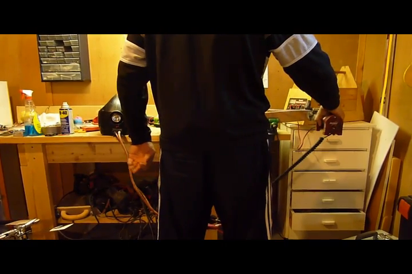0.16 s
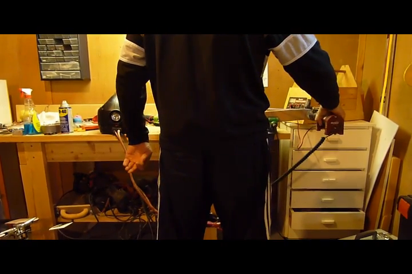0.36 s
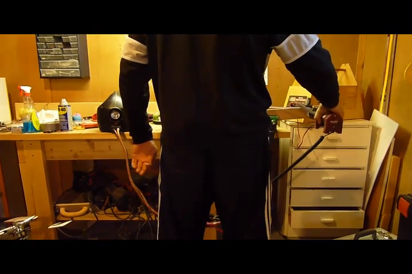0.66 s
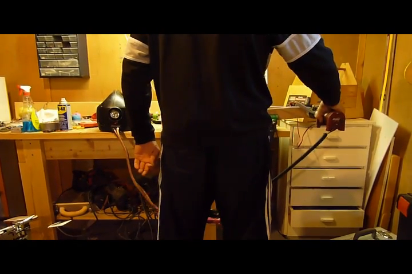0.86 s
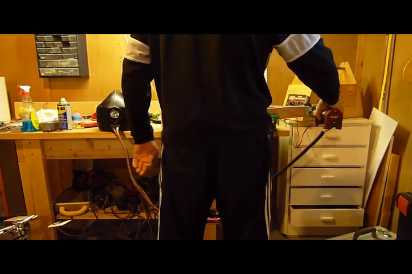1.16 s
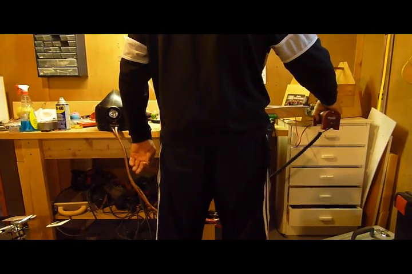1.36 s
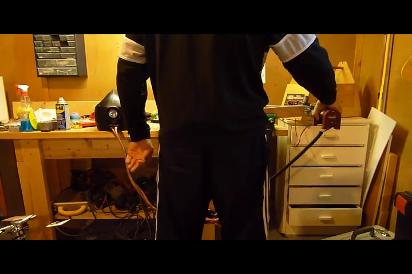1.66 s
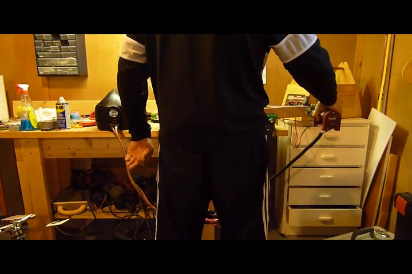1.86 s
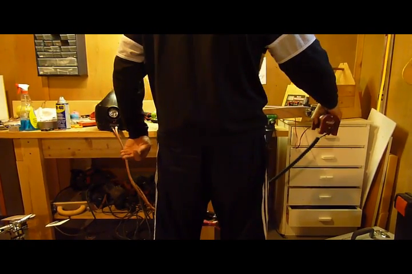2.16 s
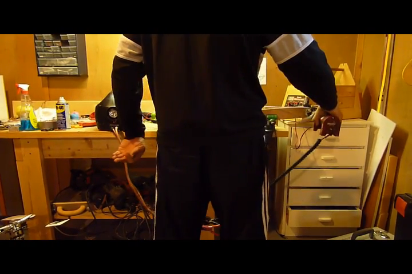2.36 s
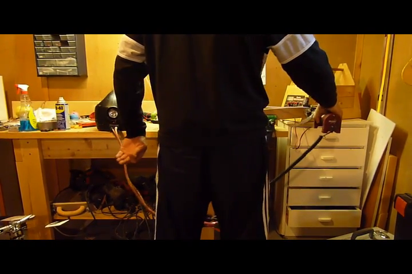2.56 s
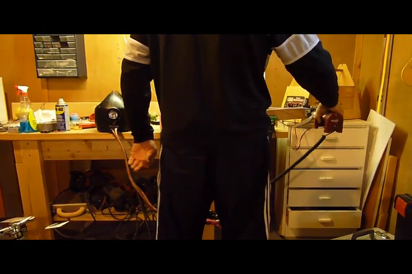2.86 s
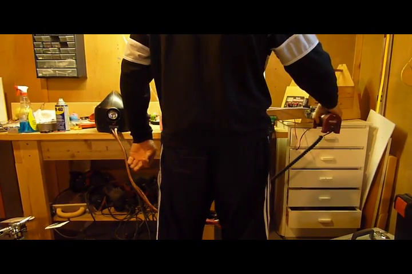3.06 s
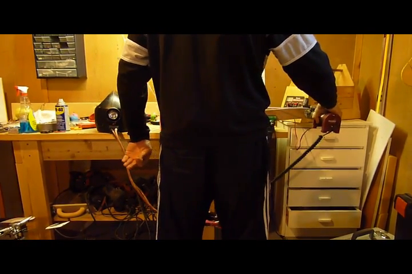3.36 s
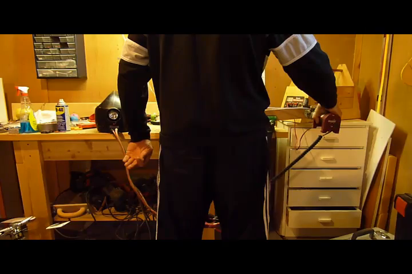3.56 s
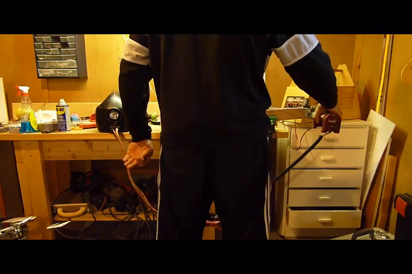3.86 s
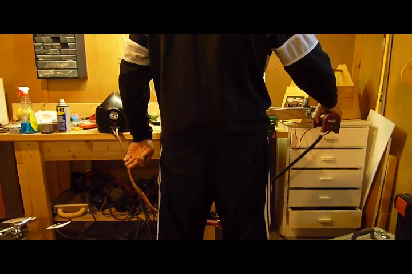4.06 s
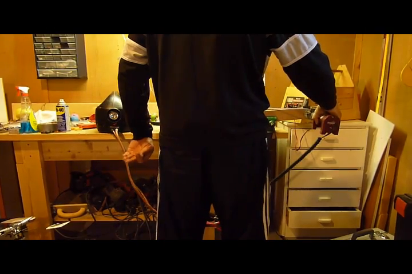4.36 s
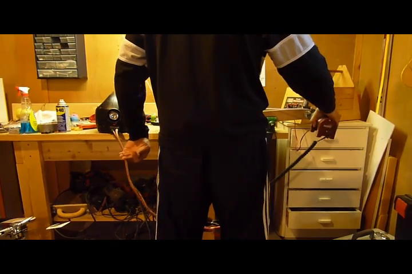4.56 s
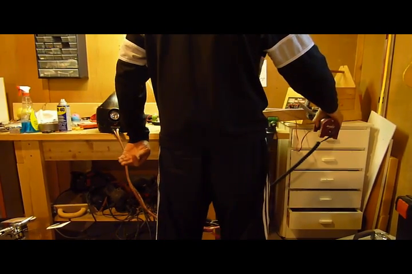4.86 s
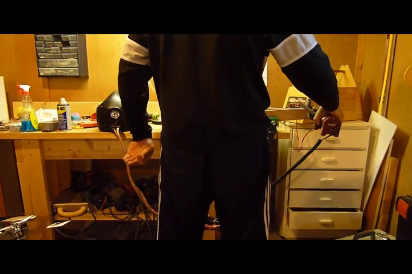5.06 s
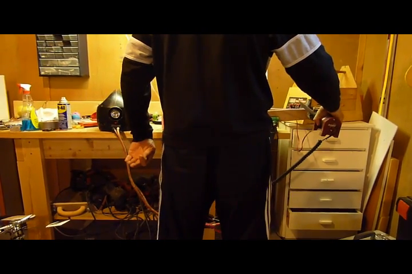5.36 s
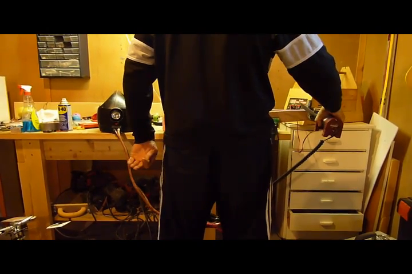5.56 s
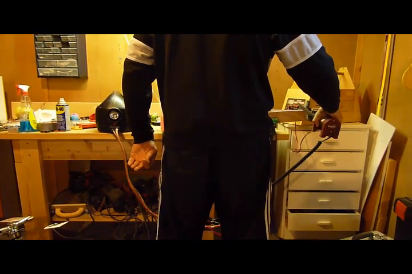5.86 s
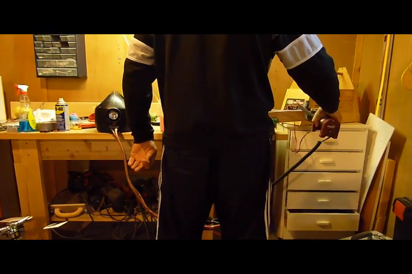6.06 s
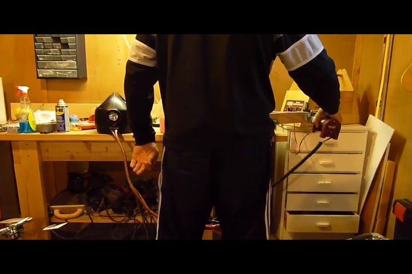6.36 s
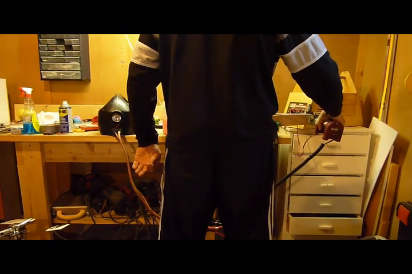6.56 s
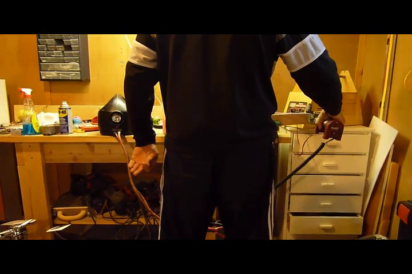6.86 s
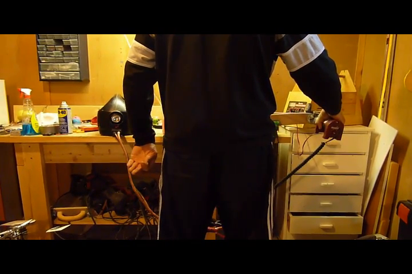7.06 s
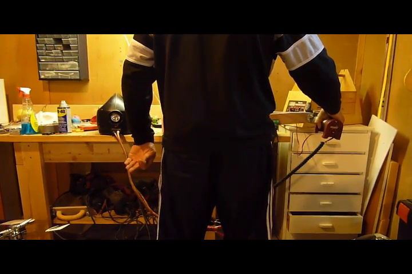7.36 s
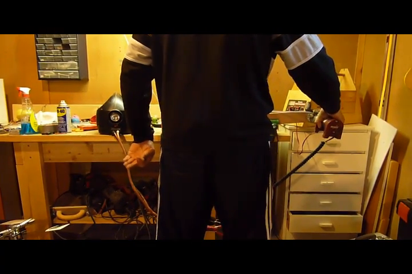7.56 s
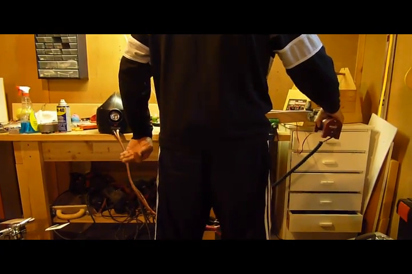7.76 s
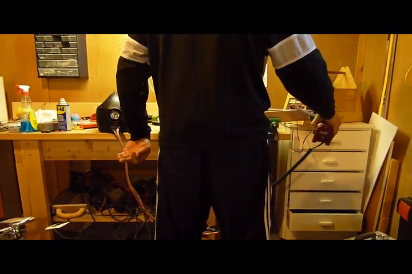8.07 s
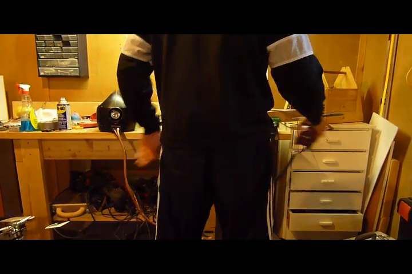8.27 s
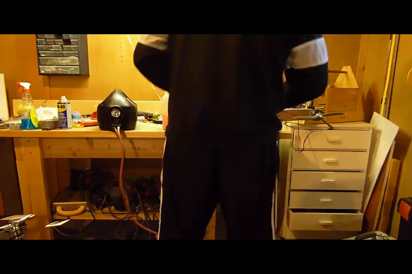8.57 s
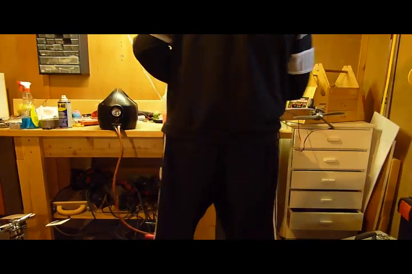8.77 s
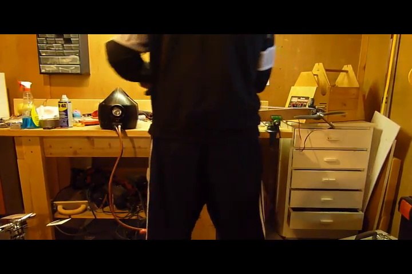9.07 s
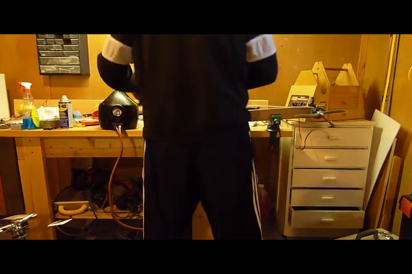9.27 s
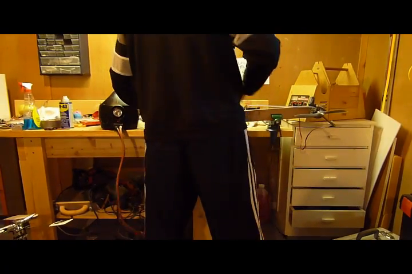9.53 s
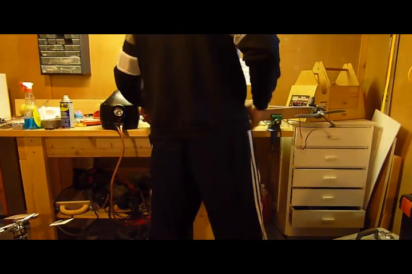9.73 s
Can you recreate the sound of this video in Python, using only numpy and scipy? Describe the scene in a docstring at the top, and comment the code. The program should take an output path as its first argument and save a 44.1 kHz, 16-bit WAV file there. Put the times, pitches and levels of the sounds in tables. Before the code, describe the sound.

In a small wooden workshop, an electric starter whirs and rattles a model engine, already running at the start. It stops, scrapes and clanks, then runs three more bursts, the last two longer. The engine never fires. Afterwards sleeves rustle softly, metal ticks, and an object is set down on wood. One fairly close, slightly dull microphone catches the room's short reverberation.

```python
"""Starter spinning a model engine

A hand-held electric starter spins a small model engine in four bursts in a wooden workshop, the first already
under way. The shaft hums on its turning orders and shakes loose parts, whose random collisions ring bench, casing
and gears; a slowing rotor scrapes. Metal clanks (noise crack, ringing modes), cloth rustles (grainy hiss) and
something is set down on wood (resonant blows). Room tone lies underneath; one band-limited microphone."""
import sys
import numpy as np
from scipy import signal
from scipy.fft import rfft, irfft, next_fast_len
from scipy.io import wavfile
from scipy.ndimage import uniform_filter1d, map_coordinates

SR = 44100
rng = np.random.default_rng(int(sys.argv[2]) if len(sys.argv) > 2 else 0)


def generate_wav(signal):
    """Clip the signal to [-1, 1] and save it as 16-bit WAV at the path in sys.argv[1]."""
    frames = np.transpose(np.atleast_2d(signal))
    scaled = np.clip(frames, -1, 1) * 32767
    pcm = np.round(scaled).astype(np.int16)
    wavfile.write(sys.argv[1], SR, pcm)


N = 436590
T = np.arange(N) / SR

# Starter bursts. Each row: full rattle reached in s, switch released in s, rattle collapses in s, bench joins in s,
# top speed in Hz, spin-up time constant in s, braking in Hz/s, extra casing-mode level in dB, collapse in dB/s,
# gears outlast the casing in s, bench outlasts the casing in s, rattle level in dB.
BURST_TABLE = [(-1, .11, .43, -1, 61, .14, 38, 6, 105, -.02, 0, -22.3),
               (1.3, 2.23, 2.45, 1.86, 62, .215, 100, 0, 160, -.08, -.02, -21),
               (3.255, 4.62, 4.89, 3.42, 62.6, .145, 80, 1, 140, .03, -.09, -21),
               (6.555, 8.06, 8.28, 6.72, 63, .13, 92, -2, 120, .03, -.12, -21.5)]
BURST_COLUMNS = ["bite_s", "release_s", "collapse_s", "join_s", "top_hz", "lag_s", "brake_hz_per_s",
                 "casing_mode_db", "fall_db_per_s", "gears_late_s", "bench_late_s", "rattle_db"]
BURSTS = [dict(zip(BURST_COLUMNS, row)) for row in BURST_TABLE]
# Rotor coasting to rest. Each row: start in s, end in s, scrape level in dB, rattle over the scrape in dB.
COAST_SPANS = [(.64, .93, -49, 3.5), (2.56, 2.62, -46, 1), (5.18, 5.36, -48, -5)]
# Shaft tones against speed. Each row: speed in Hz, first order in dB, second order in dB, higher orders in dB.
SHAFT_ANSWER = [(35, -80, -80, -50), (43, -64, -60, -40), (49, -55, -66, -37), (52.5, -46, -62, -36),
                (55.5, -60, -60, -33), (58.5, -60, -57, -31), (60.3, -58, -55, -36), (61.3, -52, -53, -45),
                (62, -48, -49, -38), (62.5, -55, -43, -33.5), (63, -51, -41.5, -35)]
# Bench answer to the higher orders. Each row: frequency in Hz, gain in dB.
BENCH_ANSWER = [(140, -12), (190, -10.5), (250, -9.5), (285, -19.5), (315, 1), (345, 2), (375, 0.5),
                (410, -5), (460, -6), (520, -16.5), (640, -8)]
# Rig resonances. Each row: frequency in Hz, width in Hz, lift over the broad colour in dB.
RIG_MODES = [(200, 30, 4), (340, 90, 5), (425, 40, 4), (600, 70, 4), (765, 25, 5), (845, 50, 7),
             (935, 45, 4), (1100, 25, 5), (1335, 50, 3), (1545, 30, 3), (1660, 30, 4), (1735, 70, 5),
             (1795, 50, 4), (1935, 30, 4), (2030, 30, 4), (2680, 40, 5), (2900, 40, 6), (3075, 70, 6),
             (3550, 140, 4), (3890, 70, 5), (4150, 45, 4), (4600, 60, 5), (4940, 70, 2), (5240, 50, 5),
             (5500, 60, 3), (5990, 50, 5)]
# Broad colour of the rig. Each row: frequency in Hz, relative spectrum in dB.
RIG_COLOUR = [(40, -49), (90, -36.5), (140, -18), (270, -8.5), (500, -5.5), (715, -8.5), (1200, -8.5),
              (2300, -9.5), (3300, -9.5), (4800, -14), (5700, -16), (6400, -23), (7000, -32.5),
              (7500, -43.5)]
# Bench, casing and gear-case modes. Each row: frequency in Hz, width before squaring in Hz, relative gain in dB.
LOUD_MODES = [(345, 80, 0), (1765, 120, 0), (3920, 80, 0)]
# Level of each loud mode. Each row: level over the rattle in dB, extra at the bite in dB,
# fade in spin-up time constants, extra once released in dB, random wander in dB.
MODE_LEVELS = [(-17, 14, .8, 0, 2.5), (-11, 7, 2, -3, 2.5), (-19, 4, 3, 4, 2.5)]
# Metal contacts. Each row: start in s, level before a common trim in dB, strongest answer in Hz, ring gain in dB,
# rise time constant in s, crack fall-off one octave away in dB (sign ignored).
CLANKS = [(.51, -33.5, 2500, -14, .004, 1), (.603, -30, 1800, -1, .004, 3), (.745, -41, 3000, -16, .004, 4),
          (1.221, -32, 1900, -4, .002, 4.5), (2.59, -36, 1800, -3, .005, 1),
          (2.821, -31, 1800, 3, .006, 3.5), (2.853, -25, 3940, -3, .008, -2.5),
          (2.8922, -10.5, 2570, -12, 0.0038, 1), (3.18, -30, 2980, -13, .004, 0),
          (3.191, -20, 3050, -17, 0.0046, 1.5), (6.458, -38.5, 1900, 0, .002, 5),
          (8.9715, -42, 4500, -15, 0.00087, 5), (9.079, -42, 2250, -1, .002, 4),
          (9.392, -44.5, 2900, -8, .002, 2), (9.6955, -20.5, 1250, -4, 0.0032, 1.5)]
# Ringing metal modes. Each row: frequency in Hz, relative level in dB, t60 in s.
METAL_MODES = [(1200, -4, .06), (1800, 0, .07), (2250, -3, .06), (2480, -2, .05), (2900, 0, .05),
               (3940, 0, .08), (4620, -6, .04), (5400, -5, .06)]
# Crack of a metal contact. Each row: frequency in Hz, relative spectrum in dB.
CRACK_COLOUR = [(50, -24.5), (120, -7), (330, 3), (800, -5), (1600, -6), (2600, -3.5), (4200, -6.5),
                (5600, -14.5), (6500, -20.5), (7500, -39)]
# Modes the scraping rotor sounds. Each row: frequency in Hz, width in Hz, relative gain in dB.
DRAG_MODES = [(860, 90, 0), (1880, 300, -13), (3300, 800, -24)]
# Cloth level. Each row: time in s, level in dB.
RUSTLE_LEVEL = [(8.55, -70), (8.65, -59), (8.88, -59), (9.09, -52), (9.17, -58), (9.43, -58), (9.62, -61),
                (9.69, -54), (9.72, -80)]
# Cloth colour. Each row: frequency in Hz, relative spectrum in dB.
CLOTH_COLOUR = [(290, -28), (500, 2), (775, -10), (906, -2), (1030, -7.5), (2220, -5.5), (5840, -15.5),
                (7310, -32.5), (9500, -68), (16100, -120)]
# Blows on wood. Each row: start in s, level before a common gain in dB.
THUMPS = [(9.7683, -19), (9.773, -9.5), (9.782, -22), (9.799, -12), (9.814, -23), (9.845, -34),
          (9.855, -26)]
# Wood resonances. Each row: frequency in Hz, width in Hz, relative gain in dB.
WOOD_MODES = [(150, 47, 0), (270, 70, 2.5), (376, 130, 0.5), (563, 110, -5.5), (700, 150, -4),
              (980, 200, -7), (1250, 200, -8), (1800, 300, -10), (2400, 400, -13)]
# Room tone. Each row: frequency in Hz, relative spectrum in dB.
AIR_COLOUR = [(15, -52.5), (25, -16.5), (43, -9.5), (129, -3.5), (188, -5), (296, -5.5), (393, -8),
              (562, -10.5), (603, -8), (712, -10), (802, -10), (4880, -24.5), (7310, -41), (9500, -75.5),
              (16100, -120)]
# Decay of the room. Each row: frequency in Hz, t60 in s.
WALL_DECAY = [(150, 0.57), (1000, 0.67), (4000, 0.39), (7500, 0.46)]

BITE_HZ = 37  # shaft speed when the rattle is full
RISE_DB_PER_S, SAG_DB_PER_S, TIRING_DB_PER_S = 400, 14, 1
COAST_RISE_DB_PER_S, COAST_FALL_DB_PER_S = 40, 120
HUM_HOLDS_DB = -27  # shaft tones die with the rattle once it falls under this
FREEWHEEL_DB = -5  # higher orders once the switch is released
BENCH_DB, BENCH_HUSH_DB, BENCH_JOIN_S = -5.2, -10, .05  # over the casing; less until it joins
GEARS_DB, GEARS_COAST_DB = -2.9, -7  # over the casing; less while coasting
CASING_HUSH_DB, GEARS_LEAD_DB = -2.5, 1.2  # until the bench joins
JOLT_DB, JOLT_S = 13, .045  # the bench jolts at the bite
AIR_DB = -52.5


def amp(db):
    """Gain of a level in dB."""
    return 10 ** (np.asarray(db) / 20)


def unit(x):
    """Scaled to rms 1."""
    return x / np.sqrt(np.mean(x ** 2) + 1e-20)


def along(points, hz):
    """(Hz, value) points read on a log frequency axis."""
    point_hz, value = np.transpose(points)
    return np.interp(np.log(hz + 1), np.log(point_hz + 1), value)


def wobble(rate_hz):
    """Smooth random curve, rate_hz knots a second."""
    coarse_s = T[::64]
    knots = rng.standard_normal(int(N * rate_hz / SR) + 4)
    return np.interp(T, coarse_s, map_coordinates(knots, [coarse_s * rate_hz]))


def filtered(x, response):
    """x times a response of frequency."""
    size = next_fast_len(len(x) + SR // 2)
    return irfft(rfft(x, size) * response(np.fft.rfftfreq(size, 1 / SR)), size)[:len(x)]


def resonant(modes):
    """Causal response of (Hz, width Hz, dB) resonances, summed with alternating sign."""
    def one(hz, k, centre_hz, width_hz, db):
        damping = 1j * hz * width_hz
        return (-1) ** k * amp(db) * damping / (centre_hz ** 2 - hz ** 2 + damping)
    return lambda hz: sum(one(hz, k, *mode) for k, mode in enumerate(modes))


def noise(spectrum):
    """Coloured noise of rms 1."""
    return unit(filtered(rng.standard_normal(N), lambda hz: amp(along(spectrum, hz))))


def impacts(rate_hz, spread_db):
    """Tiny collisions at random moments, of either sign and uneven size."""
    struck = rng.random(N) < rate_hz / SR
    sign = rng.choice([-1, 1], N)
    return struck * sign * amp(spread_db * rng.standard_normal(N).clip(-2, 2))


def room(x):
    """Delayed noise tail in which each frequency dies at its own speed."""
    hz, t, z = signal.stft(rng.standard_normal(SR * 3 // 4), SR, nperseg=256)
    t60_s = np.clip(along(WALL_DECAY, hz), .05, 2)[:, None]
    tail = signal.istft(z * amp(-60 * t / t60_s), SR, nperseg=256)[1]
    delayed = np.pad(x, (300, 0))
    return signal.fftconvolve(delayed, tail / np.linalg.norm(tail))[:len(x)]


def patchy(x, depth_db):
    """Regions of the spectrum swell and fade on their own."""
    z = signal.stft(x, nperseg=512)[2]
    across_hz = uniform_filter1d(rng.standard_normal(z.shape), size=3, axis=0)
    field = uniform_filter1d(across_hz, size=16, axis=1)
    return signal.istft(z * amp(depth_db * unit(field)), nperseg=512)[1][:N]


def past(s):
    """Seconds gone since a moment, zero before it."""
    return np.clip(T - s, 0, None)


def until(s):
    """Seconds left to a moment, zero after it."""
    return np.clip(s - T, 0, None)


def steady(burst):
    """No change for this burst."""
    return 0


def released(burst):
    """Rises quickly from 0 to 1 when the switch is let go."""
    return np.clip(past(burst["release_s"]) / .08, 0, 1)


def kick(burst, fade_s):
    """Jumps to 1 at the bite, then dies away."""
    return np.clip(1 - until(burst["bite_s"]) / .03, 0, 1) * np.exp(-past(burst["bite_s"]) / fade_s)


def speed_hz():
    """The motor creeps up to its top speed, then brakes evenly once released."""
    def run(b):
        lag = np.exp(np.clip((b["bite_s"] - T) / b["lag_s"], None, 3))
        spun_up = b["top_hz"] - (b["top_hz"] - BITE_HZ) * lag
        return spun_up - b["brake_hz_per_s"] * past(b["release_s"])
    return np.max([0 * T] + [run(b) for b in BURSTS], axis=0)


def shake_db(late_s, extra_db):
    """Rattle level: steep rise, tiring hold, sag after release, collapse delayed by late_s(burst)."""
    def level_db(b):
        rise = -RISE_DB_PER_S * until(b["bite_s"])
        tiring = -TIRING_DB_PER_S * past(max(b["bite_s"], 0))
        sag = -SAG_DB_PER_S * past(b["release_s"])
        collapse = -b["fall_db_per_s"] * past(b["collapse_s"] + late_s(b))
        return b["rattle_db"] + rise + tiring + sag + collapse + extra_db(b)
    return np.max([level_db(b) for b in BURSTS], axis=0)


def coast_db(rattle_share):
    """Level of the coasting rotor's scrape (0) or of the rattle it keeps up (1)."""
    def level_db(start_s, end_s, db, over_db):
        edges = -COAST_RISE_DB_PER_S * until(start_s) - COAST_FALL_DB_PER_S * past(end_s)
        return db + rattle_share * over_db + edges
    return np.max([level_db(*row) for row in COAST_SPANS], axis=0)


def shaft():
    """The unbalanced shaft hums on its low orders; returns the hum and the angle turned."""
    speed = speed_hz()
    answer_hz, *answers = np.transpose(SHAFT_ANSWER)
    first_db, second_db, knock_db = [np.interp(speed, answer_hz, db, left=-120) for db in answers]
    freewheel = sum(released(b) * (T < b["collapse_s"] + .5) for b in BURSTS)
    knock_db = knock_db + FREEWHEEL_DB * freewheel
    angle = 2 * np.pi * np.cumsum(speed) / SR
    hum = amp(first_db + 1.5 * wobble(4)) * np.sin(angle) + amp(second_db) * np.sin(2 * angle)
    knock = 0
    # no two turns are alike, so each higher order swells and fades on its own
    for k in range(3, 11):
        gain = amp(along(BENCH_ANSWER, k * speed) + 2 * wobble(8))
        knock = knock + gain * np.sin(k * angle + .3 * wobble(6) + 2 * np.pi * rng.random())
    hold_db = np.clip(shake_db(lambda b: b["bench_late_s"] / 2, steady) - HUM_HOLDS_DB, None, 0)
    return np.sqrt(2) * amp(hold_db) * (hum + amp(knock_db) * knock), angle


def rattle(angle):
    """Loose parts collide, thickest once a turn, and ring the rig; the room blurs them."""
    blows = impacts(rate_hz=7000, spread_db=4) * (1 + .08 * np.cos(angle))

    def rig(hz):
        lift_db = sum(db / (1 + (2 * (hz - c) / width) ** 2) for c, width, db in RIG_MODES)
        return amp(along(RIG_COLOUR, hz) + lift_db)
    ringing = filtered(blows, rig)
    ringing = ringing + amp(-4) * room(ringing)
    # the grip shifts, so different parts take turns to ring loudest
    ringing = patchy(ringing, depth_db=1)

    def below(hz, edge_hz):
        return 1 / (1 + (hz / edge_hz) ** 12)
    bench = filtered(ringing, lambda hz: below(hz, 700))
    gears = filtered(ringing, lambda hz: 1 - below(hz, 2300))
    casing = ringing - bench - gears

    def apart(b):  # 1, then down to 0 as the bench joins
        return np.clip(until(b["join_s"]) / BENCH_JOIN_S, 0, 1)

    def bench_extra_db(b):
        return BENCH_HUSH_DB * apart(b) + JOLT_DB * kick(b, JOLT_S)
    coast = coast_db(rattle_share=1)

    def levelled(part, db, late_s, extra_db, coast_extra_db):
        level_db = db + np.maximum(shake_db(late_s, extra_db), coast + coast_extra_db)
        return unit(part) * amp(level_db + .6 * wobble(14))
    return (levelled(casing, 0, steady, lambda b: CASING_HUSH_DB * apart(b), 0)
            + levelled(bench, BENCH_DB, lambda b: b["bench_late_s"], bench_extra_db, 0)
            + levelled(gears, GEARS_DB, lambda b: b["gears_late_s"], lambda b: GEARS_LEAD_DB * apart(b),
                       GEARS_COAST_DB))


def singing():
    """Three modes ring most freely during spin-up, then wander: steep, narrow bands of collisions."""
    # collapse delay in s and extra level in dB for each burst: bench, casing, gear case
    per_burst = [(lambda b: b["bench_late_s"], steady), (steady, lambda b: b["casing_mode_db"]),
                 (lambda b: b["gears_late_s"], steady)]

    def sung(mode, late_s, more_db, db, bite_db, fade_lags, free_db, wander_db):
        def extra_db(b):
            return db + more_db(b) + bite_db * kick(b, fade_lags * b["lag_s"]) + free_db * released(b)
        level_db = wander_db * wobble(9) + shake_db(late_s, extra_db)
        band = filtered(impacts(rate_hz=3000, spread_db=5), lambda hz: resonant([mode])(hz) ** 2)
        return amp(level_db) * unit(band)
    return sum(sung(mode, *own, *row) for mode, own, row in zip(LOUD_MODES, per_burst, MODE_LEVELS))


def room_tone():
    """Steady coloured noise with a slight wander in level."""
    return amp(AIR_DB + 0.37 * wobble(5.4)) * noise(AIR_COLOUR)


def clanks():
    """Each contact is a crack and a short ring of the modes nearest the blow, with a fresh wall tail."""
    out, t = np.zeros(N + SR), np.arange(SR * 3 // 4) / SR
    for start_s, db, centre_hz, ring_db, rise_s, focus_db in CLANKS:
        def near_db(hz, slope_db):
            return -slope_db * np.log2((hz + 50) / centre_hz) ** 2
        ring = 0
        for hz, mode_db, t60_s in METAL_MODES:
            level_db = mode_db + near_db(hz, 40) + rng.normal(0, 1.6)
            ring = ring + amp(level_db - 60 * t / t60_s) * np.sin(2 * np.pi * hz * t)
        crack = unit(filtered(rng.standard_normal(len(t)),
                              lambda hz: amp(along(CRACK_COLOUR, hz) + near_db(hz, abs(focus_db)))))
        hit = amp(ring_db) * ring + crack * amp(-60 * t / .11)
        hit = hit * (1 - np.exp(-t / abs(rise_s)))
        out[round(start_s * SR):][:len(t)] += amp(db - 6.5) * (hit + amp(-0.5) * room(hit))
    return out[:N]


def coasting():
    """The slowing rotor scrapes in a soft flutter and sounds the casing's softest modes."""
    flutter = 1 + .5 * np.cos(2 * np.pi * 28 * T + 2 * wobble(6.6))
    scrape = filtered(impacts(rate_hz=2500, spread_db=3) * flutter, resonant(DRAG_MODES))
    return amp(coast_db(rattle_share=0)) * unit(scrape + amp(-11.5) * room(scrape))


def rustle():
    """Sleeves brush as the arms move: grainy hiss."""
    level_db = np.interp(T, *np.transpose(RUSTLE_LEVEL), left=-120, right=-120)
    grains = filtered(impacts(rate_hz=3000, spread_db=3.5), lambda hz: amp(along(CLOTH_COLOUR, hz)))
    return amp(level_db + 2.5 * wobble(25)) * unit(grains)


def thumps():
    """A soft push, with a little grit in the contact, rings the wood."""
    blows, t = np.zeros(N), np.arange(SR // 50) / SR
    for start_s, db in THUMPS:
        grit = .3 * np.exp(-t / .005) * rng.standard_normal(len(t))
        push = t / .0003 * np.exp(-t / .0003) + grit
        blows[round(start_s * SR):][:len(t)] += amp(db + 20.5) * push / np.linalg.norm(push)
    # the last factor is a 100 Hz high-pass
    knock = filtered(blows, lambda hz: resonant(WOOD_MODES)(hz) * hz / (hz - 100j))
    return knock + amp(-1) * room(knock)


def scene():
    """One microphone feeds both channels."""
    hum, angle = shaft()
    machine = hum + rattle(angle) + singing() + coasting()
    mono = machine + room_tone() + clanks() + rustle() + thumps()
    return np.array([mono, mono])


def record(dry):
    """The input stage rounds off peaks; the response falls from 7350 Hz and ends at 7700 Hz."""
    soft = dry / (1 + np.abs(dry / .62) ** 4) ** .25

    def edge(hz):
        return amp(-20 * np.clip((hz - 7350) / 350, 0, 1) ** 2) * (hz < 7700)
    return np.array([filtered(channel, edge) for channel in soft])


dry = scene()
out = record(dry)
generate_wav(out)
```